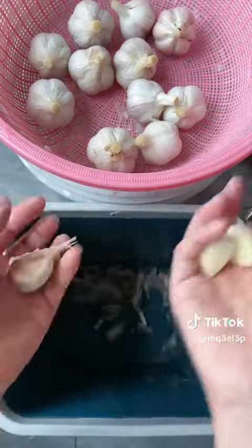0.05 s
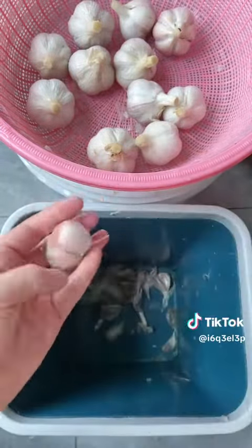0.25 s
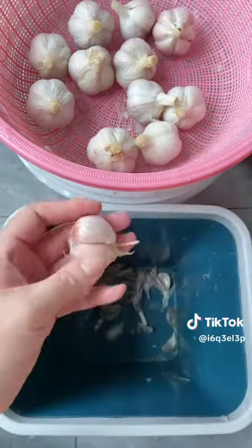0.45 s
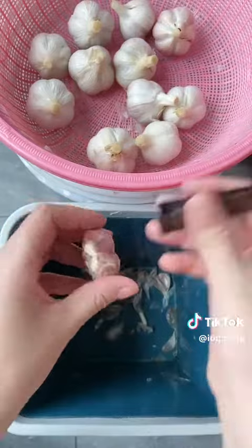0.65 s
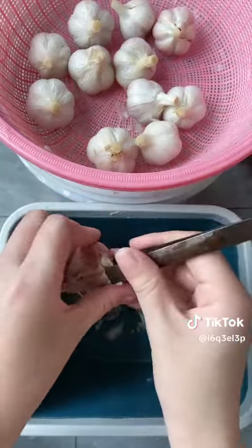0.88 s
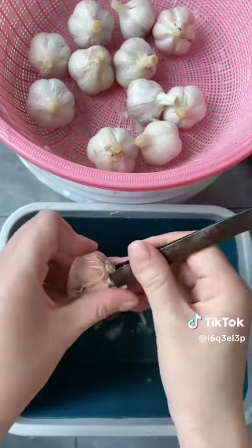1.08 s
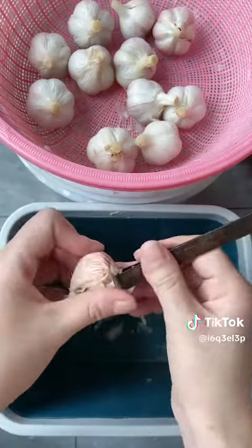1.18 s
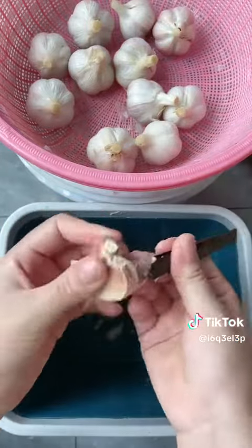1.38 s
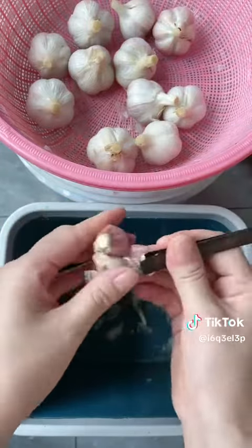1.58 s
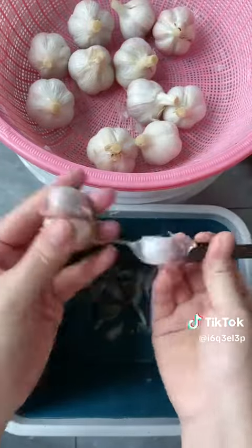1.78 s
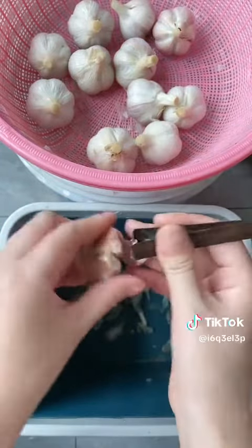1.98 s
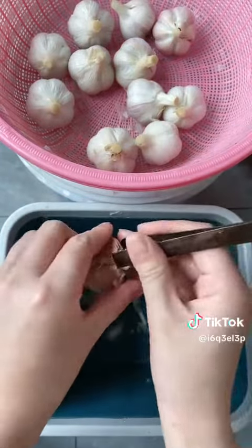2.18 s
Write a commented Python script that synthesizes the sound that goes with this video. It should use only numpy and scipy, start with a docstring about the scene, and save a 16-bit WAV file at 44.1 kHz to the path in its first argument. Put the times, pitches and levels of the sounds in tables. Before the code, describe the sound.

Peeled garlic cloves drop into a plastic tub with hollow knocks, then roll and clatter against its side. Fingers rustle dry skin, a small knife crunches in and a strip tears off, close to the microphone in a quiet room.

```python
"""Over a faint low hum, peeled garlic cloves drop into a plastic tub and make its thin wall ring.
They roll and clatter against the side while fingers rustle dry skin. A small knife bites into
the next clove; its skin snaps and tears off in one strip, each broken fibre a tiny click.
It all happens close to the microphone in a small, quiet room."""
import sys
import numpy as np
from scipy import signal
from scipy.fft import rfft, irfft
from scipy.io import wavfile
from scipy.ndimage import uniform_filter1d

SR = 44100
rng = np.random.default_rng(int(sys.argv[2]) if len(sys.argv) > 2 else 0)


def inscribe(sig):
    """Save sig as 16-bit PCM at rate SR to the path in sys.argv[1].

    A 1-D sig is mono; a 2-D sig holds one channel per row.
    Samples are clipped to [-1, 1] before scaling.
    """
    pcm = np.round(np.clip(np.atleast_2d(sig).T, -1, 1) * 32767)
    wavfile.write(sys.argv[1], SR, pcm.astype(np.int16))


N = 99225
T = np.arange(N) / SR


def amp(db):
    """Turns decibels into a gain."""
    return 10 ** (np.asarray(db) / 20)


def evened(x):
    """Scales a signal to an average power of 1."""
    return x / np.sqrt(np.mean(x ** 2) + 1e-20)


def read(points, hz):
    """Looks up a table's value at any frequency."""
    f, value = np.transpose(points)
    return np.interp(np.log(hz + 1), np.log(f + 1), value)


def level(points):
    """A gain that follows a level curve, silent outside it."""
    return amp(np.interp(T, *np.transpose(points), left=-200, right=-200))


def add(mix, start_s, sound):
    """Mixes a sound in at a given time."""
    part = mix[max(round(start_s * SR), 0):][:len(sound)]
    part += sound[:len(part)]


def through(x, response):
    """Plays a sound through an object's response to one click."""
    return signal.fftconvolve(x, response)[:N]


def colour(x, spectrum, size=8192):
    """Gives a sound a tone colour, without ringing before it starts."""
    log_gain = np.log(amp(read(spectrum, abs(np.fft.fftfreq(size, 1 / SR)))))
    response = np.fft.ifft(np.exp(np.conj(signal.hilbert(log_gain)))).real[:size // 2]
    return through(x, response / np.linalg.norm(response))


def ring(modes):
    """The fading tones of an object tapped once."""
    t = T[:SR // 2]
    return sum(amp(db - 60 * t / t60) * np.cos(2 * np.pi * hz * t) for hz, db, t60 in modes)


def blows(rows):
    """Short smooth pushes; the softer the contact, the longer the push."""
    force = np.zeros(N)
    for start_s, db, hz in rows:
        u = 2 * np.pi * hz * T[:2048]
        push = u ** 3 * np.exp(-u)
        add(force, start_s, amp(db) * push / push.sum())
    return force


def crackle(spread_db, size=N, clicks_per_s=13000):
    """Dense tiny clicks; more spread makes their sizes less even."""
    chance, strength, sign = rng.random((3, size))
    sizes = amp(spread_db * np.minimum(-np.log(1 - strength), 4))
    return evened((chance < clicks_per_s / SR) * sizes * np.sign(sign - .5))


def bursts(rows, spread_db, size=4096, attack_s=0.00013):
    """Clumps of clicks that start at once and die away."""
    out, t = np.zeros(N), T[:size]
    for start_s, db, decay_s in rows:
        shape = (1 - np.exp(-t / attack_s)) * np.exp(-t / decay_s)
        clump = crackle(spread_db, size) * shape
        add(out, start_s, amp(db) * clump * np.linalg.norm(shape) / np.linalg.norm(clump))
    return out


def strokes(rows):
    """A gain that swells and fades in one rounded arch per stroke."""
    return sum(amp(db) * np.sqrt(abs(np.sin(np.pi * np.clip((T - start_s) / length_s, 0, 1))))
               for start_s, length_s, db in rows)


# The room's steady noise. Each row: frequency in Hz, level in dB.
AIR_COLOUR = [(15, -40), (30, -6), (52, 1.5), (80, -3), (105, -7), (160, -16), (220, -13.5), (350, -14.5),
              (550, -20), (1000, -25.5), (2000, -31.5), (4000, -37.5), (8000, -41), (16000, -47.5)]
# Low hums. Each row: pitch in Hz, early level in dB, late level in dB.
HUMS = [(75.6, -48, -52.5), (54.5, -87, -65.5)]

def background(air_db=-47.5, waver_db=1.3, change_s=1.67):
    """Soft room noise and two wavering hums; late on, one sinks and the deeper one rises."""
    air_gain = amp(read(AIR_COLOUR, np.fft.rfftfreq(N, 1 / SR)))
    out = amp(air_db) * evened(irfft(rfft(rng.standard_normal(N)) * air_gain, N))
    late = .5 + .5 * np.tanh((T - change_s) / 0.17)
    for pitch, early_db, late_db in HUMS:
        waver = evened(sum(np.sin(2 * np.pi * (hz * T + rng.random())) for hz in np.geomspace(1, 7, 10)))
        gain = amp(early_db + (late_db - early_db) * late + waver_db * waver)
        out += np.sqrt(2) * gain * np.sin(2 * np.pi * (pitch * T + rng.random()))
    return out


# Cloves landing. Each row: start in seconds, level in dB, brightness in Hz.
LANDINGS = [(0.2053, -27, 5000), (0.2089, -17.5, 3650), (0.2112, -7, 710), (0.2598, -17, 1920),
            (0.2616, -3.5, 980), (.2695, -8.5, 745), (.283, -21, 1530), (0.3076, -22, 720),
            (0.3103, -10.5, 650), (0.3215, -23, 590), (.349, -35, 890), (.459, -31, 1300)]
# The tub's ringing. Each row: pitch in Hz, level in dB, seconds to fade by 60 dB.
TUB_TONES = [(211.8, -9, 0.071), (285, -13.5, 0.11), (417, -4, 0.045), (425.4, -8, 0.073),
             (523, -7.5, 0.032), (546, -12.5, 0.037), (740, -19, 0.027), (805, -10, 0.032),
             (975, -2.5, 0.022), (1075, -11.5, 0.022), (1320, 1, 0.037), (1430, -28, 0.036),
             (1750, 0.5, 0.015), (2186, -8, 0.033)]
# Sharp first contacts. Each row: start in seconds, level in dB, fade time in seconds.
SLAPS = [(.2025, -18, 0.0037), (.2055, -16, 0.0026), (.2555, -33.5, 0.012)]
# The tone of a slap. Each row: frequency in Hz, level in dB.
SLAP_COLOUR = [(100, -14), (500, -19), (1000, 0.5), (1400, 9.5), (2300, -17), (2900, -3.5), (3400, -7.5),
               (4500, -6.5), (8000, -11), (16000, -21.5)]

def dropped_cloves(wall_db=-20, wall_fade_s=0.04, lowest_hz=233):
    """Soft blows ring the tub and set its thin wall shivering; the first contacts also slap."""
    shiver = rng.standard_normal(SR // 4) * amp(-60 * T[:SR // 4] / wall_fade_s)
    body = through(blows(LANDINGS), ring(TUB_TONES))
    body += amp(wall_db) * through(body, shiver / np.linalg.norm(shiver))
    # A small tub gives off little bass.
    body = signal.sosfilt(signal.butter(2, lowest_hz, "highpass", fs=SR, output="sos"), body)
    return body + colour(bursts(SLAPS, spread_db=3), SLAP_COLOUR)


def flaky(x, patch_hz=1284, patch_s=0.019, depth_db=3.5):
    """Random patches of tone colour, as one flake of skin after another sounds."""
    hz, t, spectrum = signal.stft(x, SR, nperseg=256, noverlap=192)
    patches = rng.standard_normal(spectrum.shape[::-1]).T
    for axis, span in enumerate([patch_hz / hz[1], patch_s / t[1]]):
        patches = uniform_filter1d(patches, max(round(span), 1), axis)
    return signal.istft(spectrum * amp(depth_db * evened(patches)), SR, nperseg=256, noverlap=192)[1][:N]


# Fingers rubbing the skin. Each row: start in seconds, length in seconds, level in dB.
RUBS = [(.418, 0.075, -53.5), (.47, 0.049, -47), (.79, 0.025, -63), (.86, 0.041, -70), (.955, 0.098, -59),
        (1.045, 0.12, -52), (1.135, 0.046, -48.5), (1.175, 0.024, -44), (1.205, 0.057, -42.5),
        (1.26, 0.06, -52.5), (1.312, 0.032, -53), (1.555, 0.16, -60), (1.87, 0.035, -63), (1.975, .05, -61),
        (2.195, 0.044, -61.5)]
# The skin snapping. Each row: start in seconds, level in dB, fade time in seconds.
SNAPS = [(.428, -45.5, 0.0087), (.487, -32.5, 0.011), (.5362, -32.5, 0.036), (.866, -46, 0.0045),
         (1.0035, -40, 0.0043), (1.079, -39, .003), (1.0965, -31.5, 0.0067), (1.11, -53, 0.003),
         (1.1608, -23, 0.00096), (1.172, -29.5, 0.0028), (1.205, -39.5, 0.011), (1.2215, -25, 0.003),
         (1.309, -40, 0.0034), (1.489, -59, .008), (1.553, -52, 0.023), (1.7525, -37, 0.0018)]
# The tone of dry skin. Each row: frequency in Hz, level in dB.
SKIN_COLOUR = [(150, 9), (700, -20), (1500, -5.5), (3000, 0.5), (4800, 0), (6500, -2), (7900, 2), (9500, 0),
               (12000, -4), (16000, -8)]

def dry_skin(catch_s=0.004, catch_db=2.5):
    """Dry fibres break as rubbed skin catches, slips unevenly and snaps."""
    catching = evened(signal.lfilter([1], [1, -np.exp(-1 / (catch_s * SR))], rng.standard_normal(N)))
    rubs = crackle(spread_db=3) * strokes(RUBS) * evened(amp(catch_db * catching))
    return colour(bursts(SNAPS, spread_db=5) + flaky(rubs), SKIN_COLOUR)


# How loud the rolling is. Each row: time in seconds, level in dB.
ROLL_LEVEL = [(.44, -59), (.484, -38), (.492, -32.5), (.508, -26), (.53, -34.5), (.545, -33), (.575, -70)]
# The tone of rolling. Each row: frequency in Hz, level in dB.
ROLL_COLOUR = [(80, -13), (180, -12), (260, 1), (340, -9), (420, 5.5), (520, 2.5), (650, -10), (790, -0.5),
               (1050, -4), (1250, -4), (1700, -17.5), (2500, -18.5), (8000, -34)]
# Scrapes around the knocks. Each row: start in seconds, level in dB, fade time in seconds.
SCRAPES = [(.5368, -22, 0.021), (.544, -19.5, 0.0052), (.555, -22, 0.0034), (.5645, -27, 0.0058),
           (.585, -31, 0.013)]
# The tone of a scrape. Each row: frequency in Hz, level in dB.
SCRAPE_COLOUR = [(100, -35), (300, -14), (520, -8), (603, 5.5), (720, -18.5), (1100, -15), (1420, 1),
                 (1850, 4), (2080, -3), (2500, -9.5), (3200, -3.5), (3790, -4.5), (4700, -11), (5300, -10),
                 (6500, -18), (8000, -17.5), (16000, -23.5)]
# Hard knocks. Each row: start in seconds, level in dB, brightness in Hz.
KNOCKS = [(.5442, -19.5, 3300), (.5457, -13, 3300), (.5495, -36, 5000), (.556, -24, 8000),
          (.565, -23, 4900)]
# The knocked side ringing. Each row: pitch in Hz, level in dB, seconds to fade by 60 dB.
SIDE_TONES = [(599.3, -16.5, 0.091), (1420, -4.5, 0.023), (1620, 0.5, 0.016), (1865, -6.5, 0.011),
              (2050, -2.5, 0.027), (2195, -22, 0.018), (3080, -28, 0.027), (4100, -24, .06),
              (5440, -32, .05)]

def clatter():
    """A clove rumbles across the tub, then scrapes and knocks against the side."""
    rolling = colour(crackle(spread_db=2.5) * level(ROLL_LEVEL), ROLL_COLOUR)
    scraping = colour(bursts(SCRAPES, spread_db=4.5), SCRAPE_COLOUR)
    knocking = through(blows(KNOCKS), ring(SIDE_TONES))
    return rolling + scraping + knocking


# The blade biting in. Each row: start in seconds, length in seconds, level in dB.
BITES = [(1.034, 0.0077, -45), (1.0435, 0.012, -36.5), (1.078, 0.014, -37.5), (1.0925, 0.0078, -34),
         (1.744, 0.016, -40)]
# The tone of cut garlic. Each row: frequency in Hz, level in dB.
BITE_COLOUR = [(100, -19), (250, -0.5), (450, -9), (680, 3.5), (880, -12), (1200, -5), (2200, -11),
               (2900, 0), (3600, -8.5), (4300, -11), (8000, -13), (16000, -23)]
# Soft bumps. Each row: start in seconds, level in dB, fade time in seconds.
BUMPS = [(1.099, -34.5, 0.0068), (1.753, -47, 0.0052)]
# The tone of a bump. Each row: frequency in Hz, level in dB.
BUMP_COLOUR = [(60, -34), (150, -1), (260, -3), (450, 5), (800, -15), (1250, 1), (2200, -24), (6000, -37)]
# Ticks of the blade's edge. Each row: start in seconds, level in dB, fade time in seconds.
TICKS = [(1.1612, -24, 0.0014), (1.1635, -40, 0.0026), (2.0743, -32.5, 0.0028), (2.0773, -35.5, .003)]
# The tone of a tick. Each row: frequency in Hz, level in dB.
TICK_COLOUR = [(300, -30), (2000, -16.5), (4500, -8), (6200, -5), (7100, 2.5), (8200, -1), (9500, -11),
               (12000, -6.5), (16000, -20)]

def knife():
    """The blade crunches in, the clove bumps as it gives way, and the edge ticks through the skin."""
    bites = colour(crackle(spread_db=4) * strokes(BITES), BITE_COLOUR)
    bumps = colour(bursts(BUMPS, spread_db=7), BUMP_COLOUR)
    ticks = colour(bursts(TICKS, spread_db=3), TICK_COLOUR)
    return bites + bumps + ticks


# How loud the tear is. Each row: time in seconds, level in dB.
TEAR_LEVEL = [(1.65, -54.5), (1.667, -42.5), (1.68, -40.5), (1.688, -50), (1.71, -37), (1.719, -38.5),
              (1.74, -32), (1.754, -30), (1.76, -50), (1.775, -67)]
# The tone of the tear. Each row: frequency in Hz, level in dB.
TEAR_COLOUR = [(150, -11), (800, -15), (1400, -5), (2000, -7.5), (2600, -15.5), (3900, 1), (4600, -5),
               (5700, -2), (8000, -5.5), (10000, -9.5), (16000, -16)]

def tearing_strip():
    """Fibres break in a quick run as one strip of skin peels away."""
    return colour(crackle(spread_db=2.5) * level(TEAR_LEVEL), TEAR_COLOUR)


# The room's echo. Each row: frequency in Hz, seconds to fade by 60 dB.
ROOM_FADE = [(150, 0.69), (400, 0.37), (1000, 0.45), (1800, 0.47), (3200, 0.55), (4500, 0.49), (9000, 0.58),
             (16000, 0.29)]

def room(x, tail_db, near_db, near_fade_s=0.13, size=32768):
    """Adds quick echoes from the hands, tub and floor, and the room's longer tail."""
    build_up = np.clip((T[:size] - .002) / 0.013, 0, 1)
    tail, near = rng.standard_normal((2, size)) * build_up
    hz, t, spectrum = signal.stft(tail, SR, nperseg=256)
    fade = amp(-60 * t / read(ROOM_FADE, hz)[:, None])
    tail = signal.istft(spectrum * fade, SR, nperseg=256)[1][:size]
    near *= amp(-60 * T[:size] / near_fade_s)
    echoes = amp(tail_db) * tail / np.linalg.norm(tail) + amp(near_db) * near / np.linalg.norm(near)
    return x + through(x, echoes)


def scene():
    """All the sounds meet at one microphone."""
    drops = room(dropped_cloves(), tail_db=-12, near_db=-10)
    rattle = room(clatter(), tail_db=-8.5, near_db=-20)
    peeling = room(knife() + dry_skin() + tearing_strip(), tail_db=-22, near_db=-12.5)
    return (drops + rattle + peeling + background())[None]


def record(dry, highest_hz=15800):
    """Cuts away the very highest treble."""
    lowpass = signal.firwin(511, highest_hz, window=("kaiser", 9), fs=SR)
    return signal.oaconvolve(dry, lowpass[None], "same")


dry = scene()
out = record(dry)
inscribe(out)
```